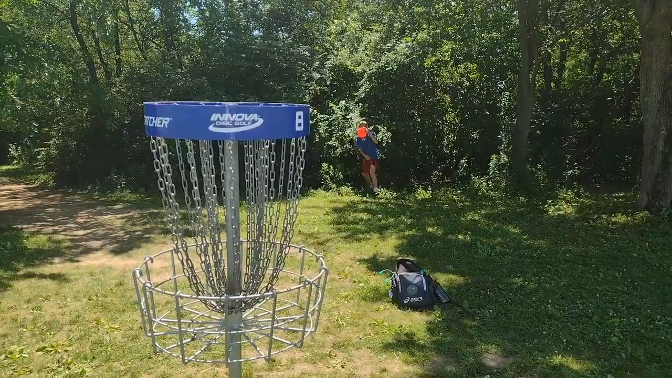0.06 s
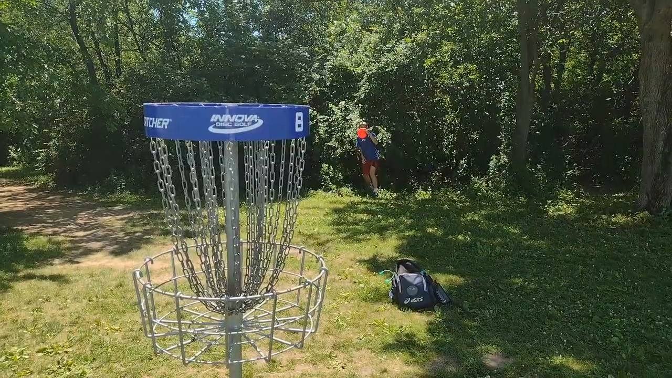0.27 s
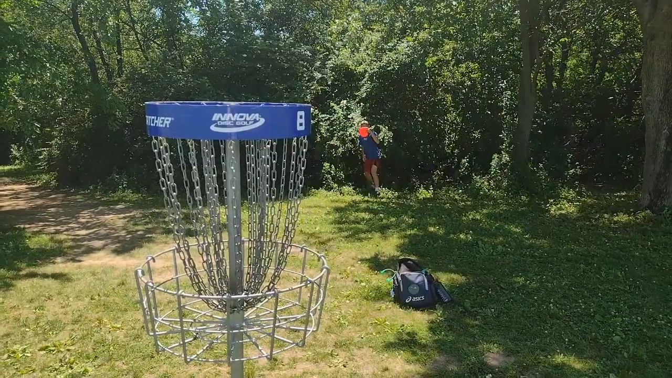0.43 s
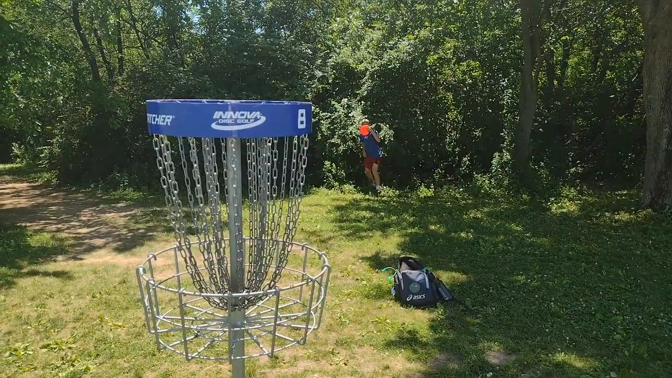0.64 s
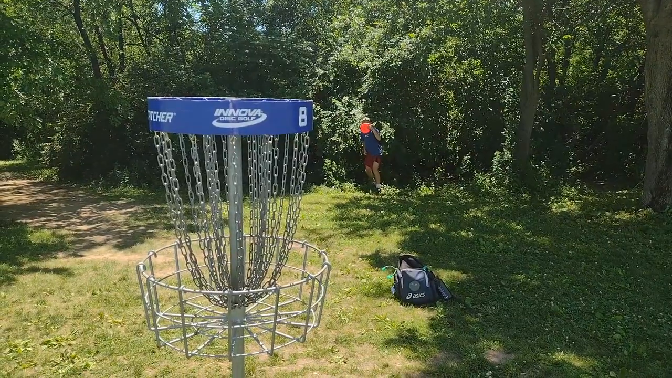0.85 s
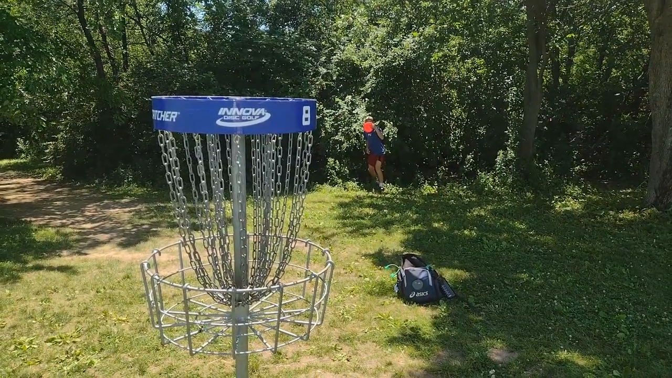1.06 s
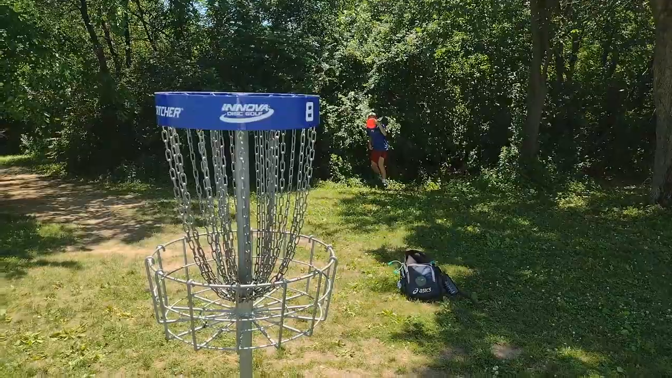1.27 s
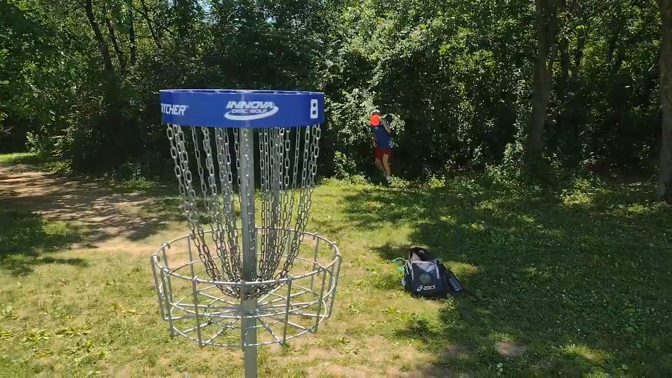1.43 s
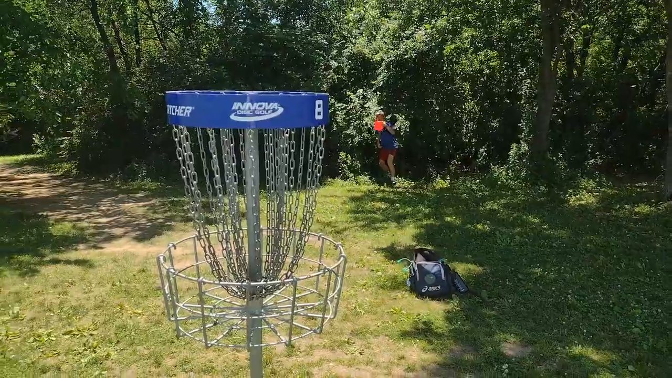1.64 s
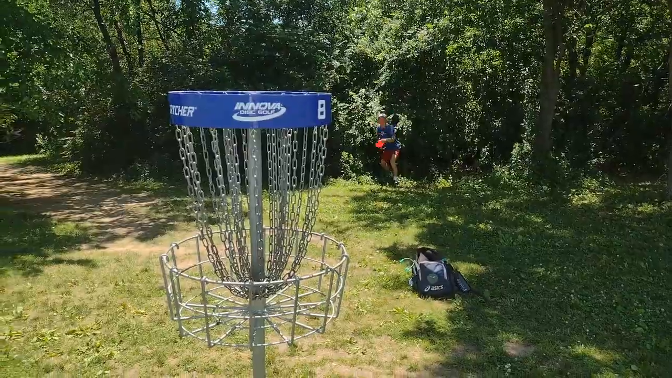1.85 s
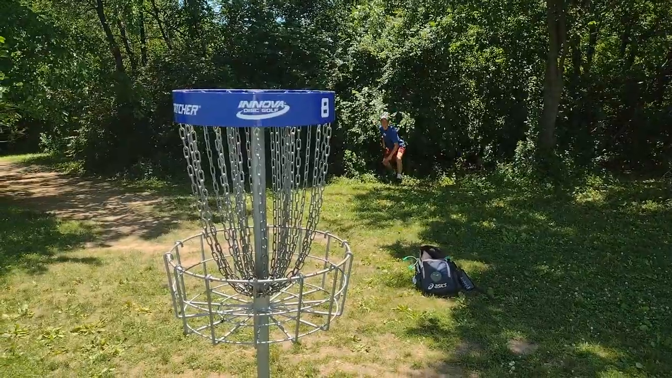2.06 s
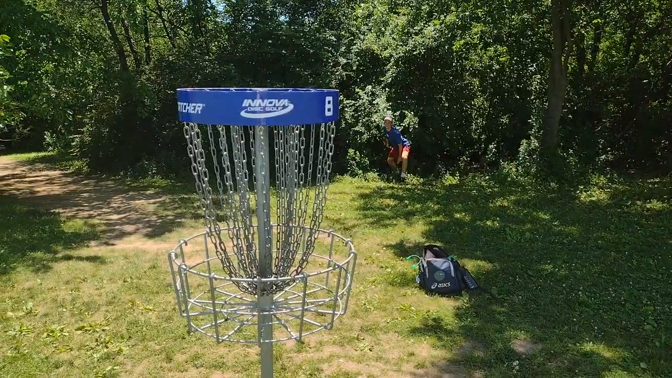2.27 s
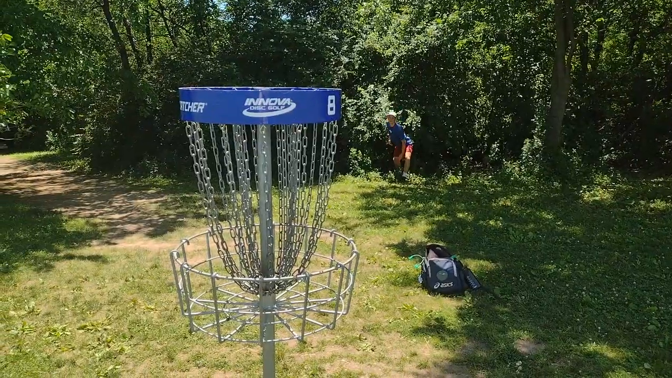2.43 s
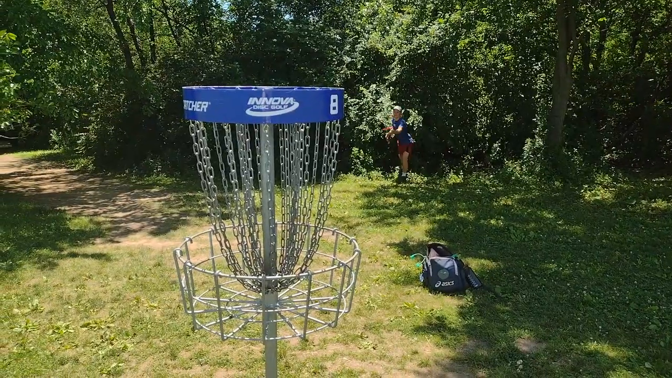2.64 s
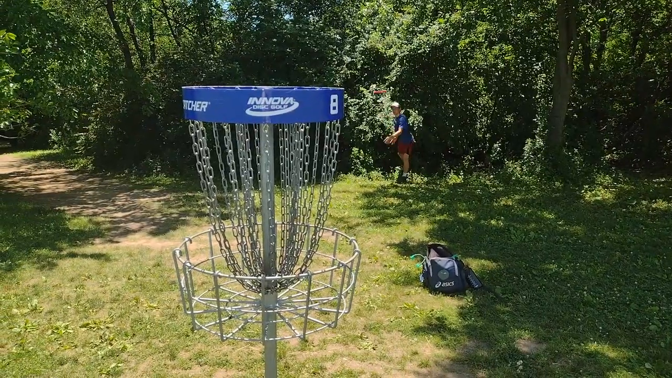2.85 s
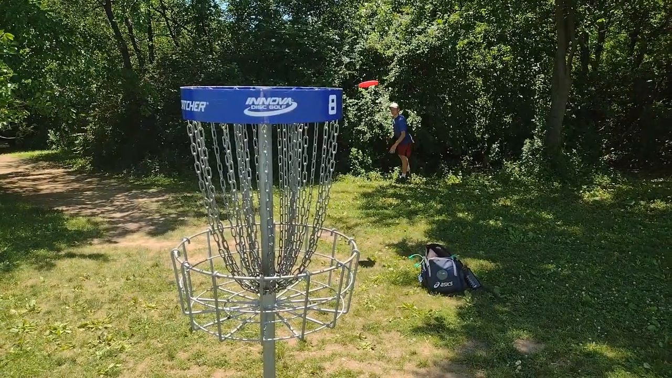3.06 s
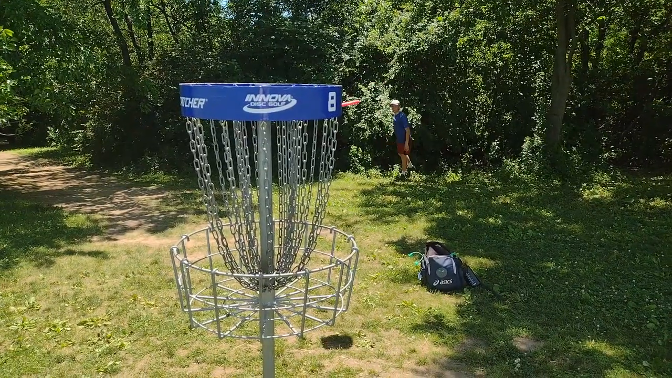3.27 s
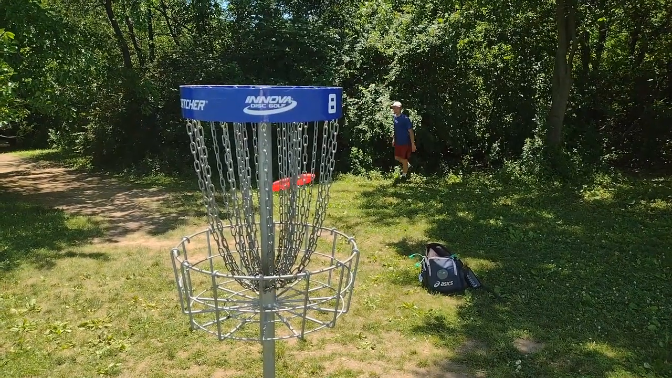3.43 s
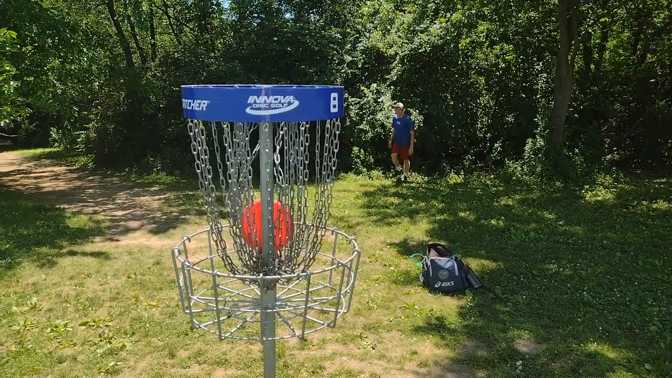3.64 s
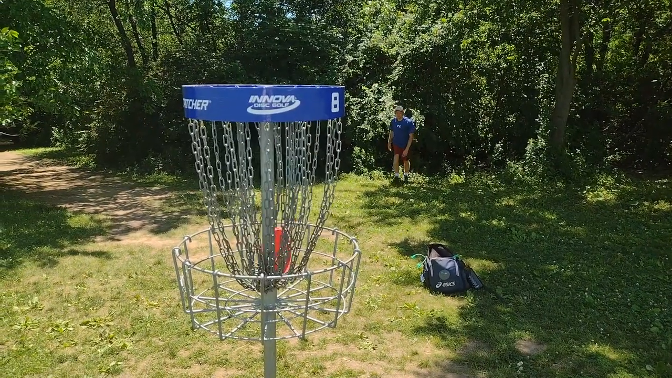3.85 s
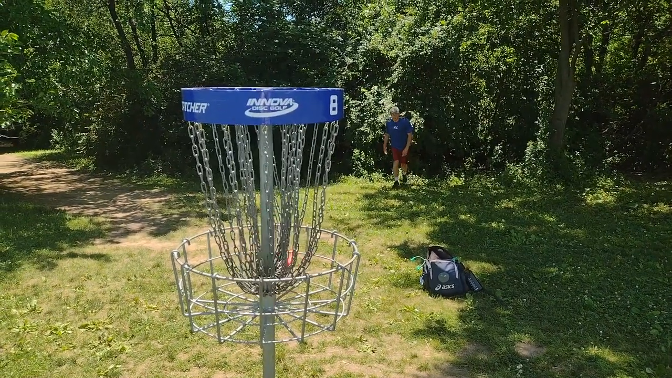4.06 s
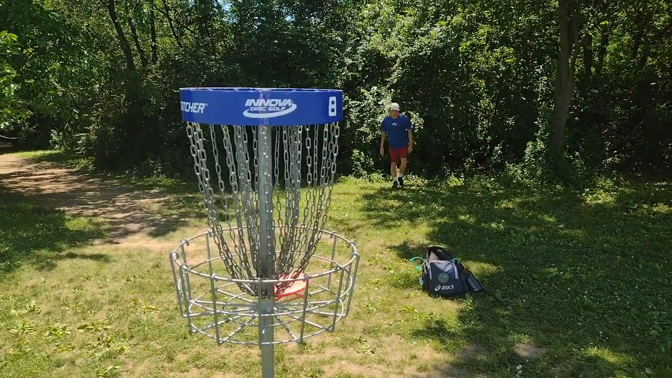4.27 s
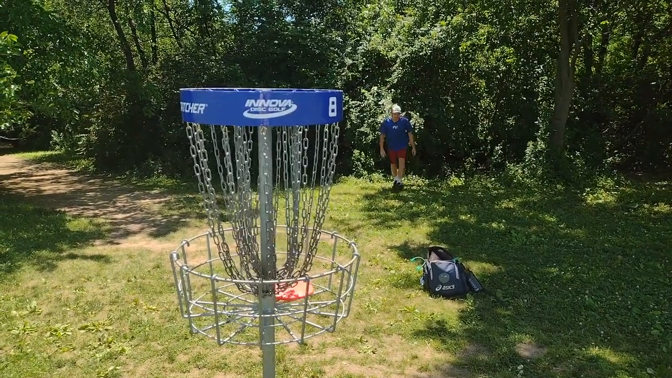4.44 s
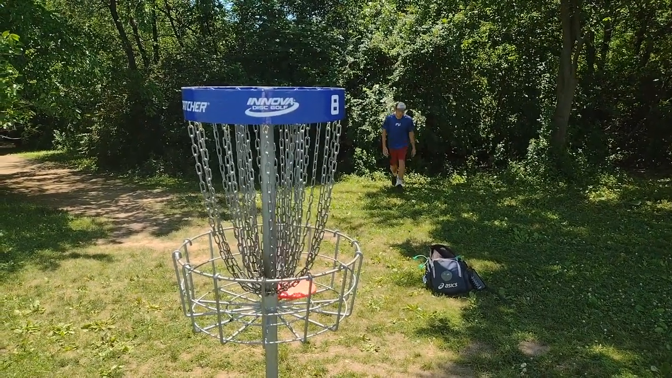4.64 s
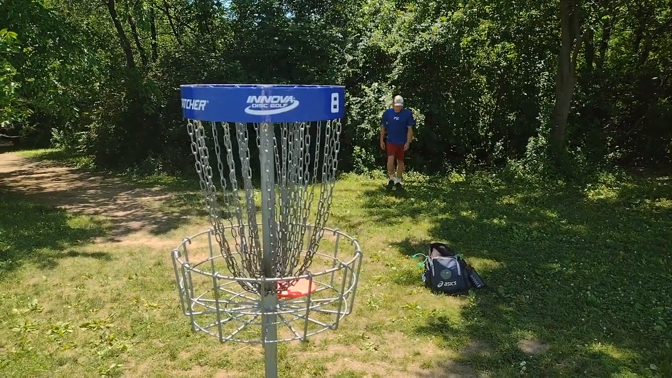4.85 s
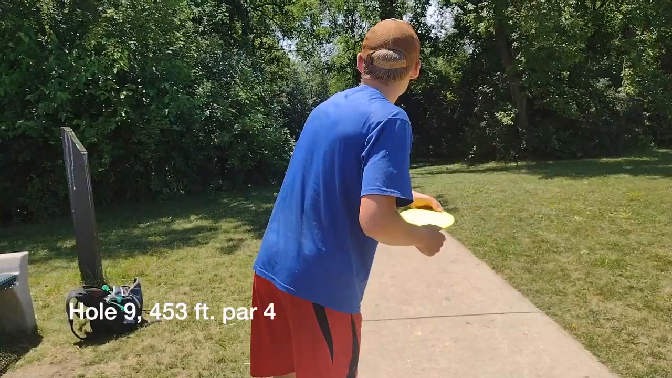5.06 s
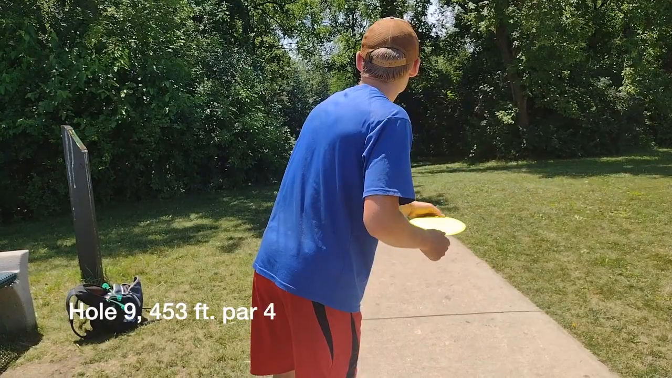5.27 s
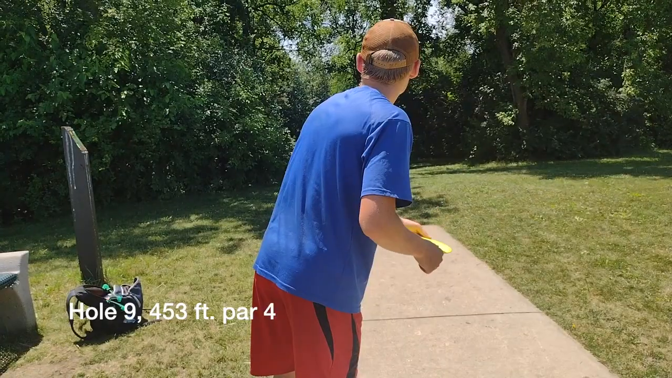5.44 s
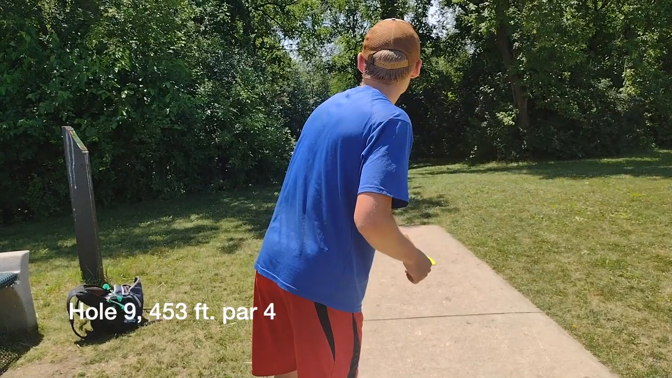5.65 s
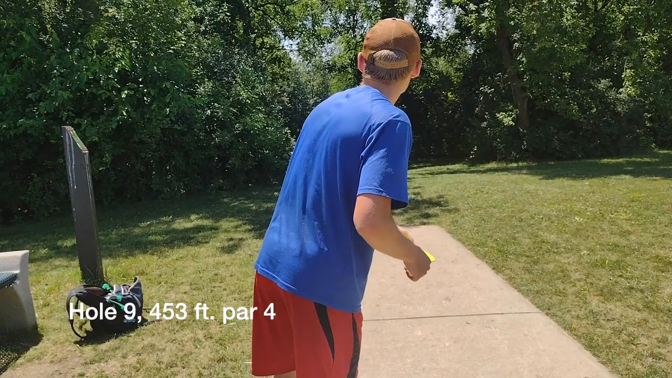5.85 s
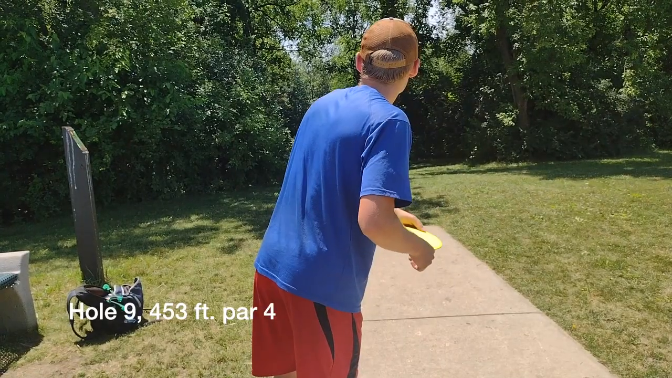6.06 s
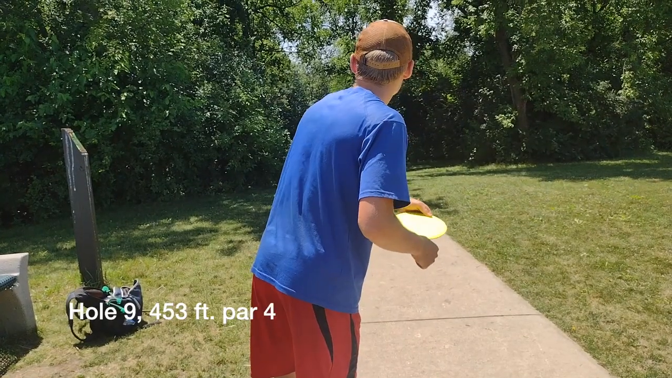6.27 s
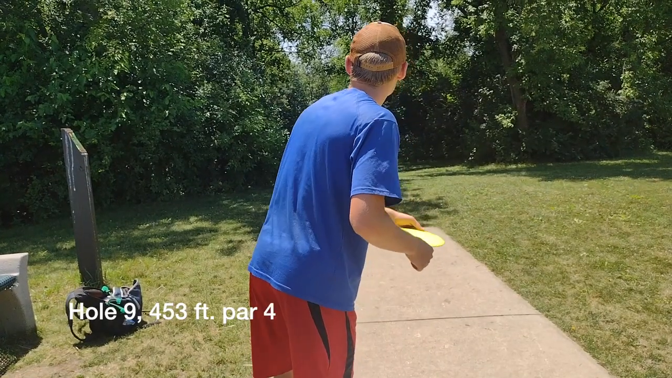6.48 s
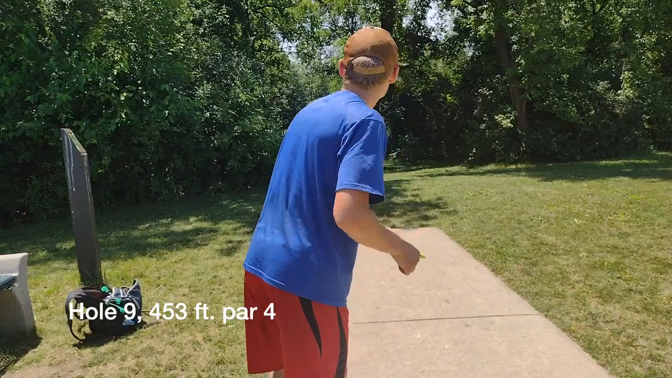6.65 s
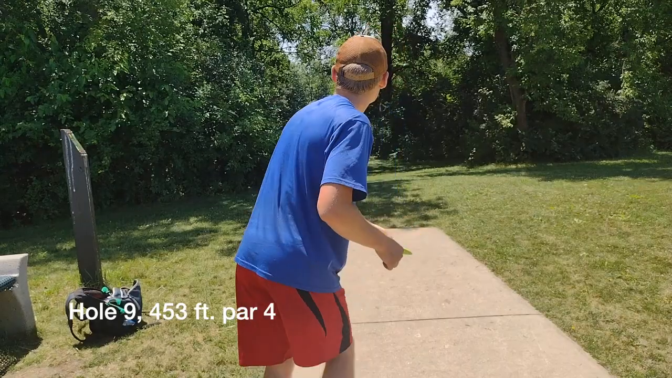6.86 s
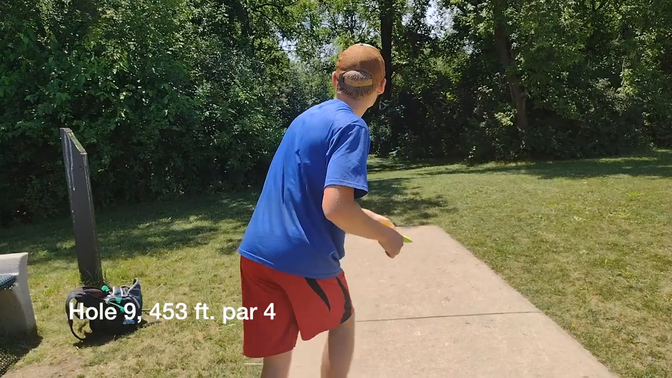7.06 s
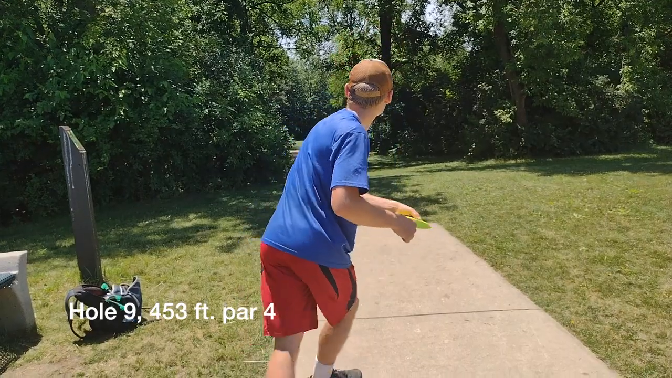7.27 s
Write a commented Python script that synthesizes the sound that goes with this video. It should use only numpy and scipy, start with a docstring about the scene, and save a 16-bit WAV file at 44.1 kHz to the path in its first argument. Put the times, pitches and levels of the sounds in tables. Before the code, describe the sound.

A sudden, bright jangle of steel chains breaks the outdoor quiet as a plastic disc strikes a metal basket nearby, slightly to the right. Hollow knocks and clanks follow as the disc drops into the wire tray, then a fading metallic hum and a couple of small taps. Before and after the hit there is only a very faint rumble of far traffic and some distant bird whistles among the trees.

```python
"""Birds call over distant traffic in a wooded park. At 3.5 s a plastic disc flies into the hanging chains
of a steel basket close by: the links clash and ring, and the pole clangs. The disc knocks its way down
and at 4.2 s lands in the wire tray, which hums on as the chains slip. Just after 5 s the scene changes
abruptly to another quiet spot by the trees, with more bird calls."""
import sys
import numpy as np
from scipy import signal
from scipy.fft import rfft, irfft
from scipy.io import wavfile

SR = 44100
rng = np.random.default_rng(int(sys.argv[2]) if len(sys.argv) > 2 else 0)


def master(y):
    """Save y as 16-bit WAV."""
    cut = np.clip(np.atleast_2d(y).T, -1, 1)
    pcm = np.round(cut * 32767)  # scale
    wavfile.write(sys.argv[1], SR, pcm.astype(np.int16))


N = 322371
TIME = np.arange(N) / SR
HIT_S, LANDING_S, CHANGE_S = 3.504, 4.2, 5.06

# The disc knocks on chains, pole and tray; the last two faint knocks are chains slipping.
# Each row: start in seconds, slap level in dB, low note's level in dB relative to the slap level.
BASKET_KNOCKS = [(3.507, -22, -13), (3.526, -14, -18), (3.544, -13, -23), (3.553, -10, -19),
                 (3.566, -9, -25), (3.583, -14.5, -24), (3.616, -20, -17), (3.650, -16, -17),
                 (3.659, -18, -10), (3.682, -31, -9), (3.695, -14, -17.5), (3.707, -18, -30),
                 (3.771, -20.5, -16), (3.812, -19, -13.5), (3.838, -15, -37), (3.861, -18, -9),
                 (3.896, -14, -16.5), (3.944, -14.5, -4.5), (3.951, -36, 4), (4.016, -20, -3),
                 (4.148, -27, -4.5), (4.218, -27, -7), (4.257, -20, -4.5), (4.2823, -22, -5.5),
                 (4.3237, -22, -10.5), (4.414, -20.5, -23), (4.434, -21, -9), (4.459, -36, -1),
                 (4.487, -28, -11), (4.687, -33, -15), (4.960, -42.5, -20)]
# The chains surge as the disc drives in, drops through and the strands swing back.
# Each row: start in seconds, length in seconds, ring level in dB, hard contact level in dB.
CHAIN_SURGES = [(3.501, .02, -35, -32), (3.559, .028, -16.5, -27), (3.636, .29, -26.5, -38),
                (3.948, .045, -27, -34.5), (4.03, .06, -28, -42), (4.147, .11, -37, -52),
                (4.313, .15, -40.5, -58), (4.52, .5, -58, -71), (4.655, .04, -47.5, -62),
                (4.914, .07, -59.5, -70)]
# The tone colour of link striking link. Each row: frequency in Hz, level in dB.
CONTACT_COLOUR = [(100, -44.5), (400, -10), (800, 3), (1500, -3.5), (2500, 2.5), (3400, -3.5), (4800, 2),
                  (6000, -2.5), (7500, -2), (10000, 2.5), (13000, -0.5), (15500, -10)]


def undb(db):
    """Turn decibels into a factor to multiply by."""
    return 10 ** (np.asarray(db) / 20)


def level(x, db):
    """Scale a sound to an average (rms) level in dB."""
    return x * undb(db) / np.sqrt(np.mean(x ** 2))


def fade(t, t60):
    """A smooth decay that is 60 dB down after the fade time, t60 seconds."""
    return np.exp(-np.log(1000) * t / t60)


def add(track, start_s, sound):
    """Mix a sound into the track at a given time."""
    i = int(start_s * SR)
    track[:, i:i + sound.shape[-1]] += sound[..., :N - i]


def colour(x, points, size=4096):
    """Shape the tone along a curve of (Hz, dB) points; white noise keeps its power."""
    hz, db = np.transpose(points)
    gain = undb(np.interp(np.log(np.fft.rfftfreq(size, 1 / SR) + 1), np.log(hz), db))
    # build the filter so that it never sounds ahead of its input
    cepstrum = irfft(np.log(gain))
    cepstrum[1:size // 2] *= 2
    cepstrum[size // 2 + 1:] = 0
    response = irfft(np.exp(rfft(cepstrum)))
    return signal.fftconvolve(x, response[None] / np.linalg.norm(response), axes=-1)[:, :x.shape[-1]]


def stereo(pair, split_hz):
    """Two unrelated signals become left and right: alike in the bass, unrelated in the treble."""
    side = signal.sosfilt(signal.butter(2, split_hz, "high", fs=SR, output="sos"), pair[1])
    return np.array([pair[0] + side, pair[0] - side]) / np.sqrt(2)


def tone(t, hz, t60, lead):
    """One fading tone of a struck object; the left channel is ahead by `lead` radians."""
    return np.sin(2 * np.pi * hz * t + np.array([[lead], [0]])) * fade(t, t60)


def from_right(x, shadow_hz=1500, left_db=-3.5, right_db=2.5):
    """The microphone's body shades the treble on the left and lifts it on the right."""
    low = signal.lfilter(*signal.butter(1, shadow_hz, fs=SR), x)
    return low + (x - low) * undb([[left_db], [right_db]])


def traffic_and_leaves(points, db, split_hz, width, sway_db):
    """Distant traffic and leaves: a gently swaying rumble under a thin, steady hiss."""
    air = stereo(rng.standard_normal((2, N)), split_hz) + width * rng.standard_normal((2, N))
    air = level(colour(air, points), db)
    rumble = signal.lfilter(*signal.butter(1, 300, fs=SR), air)
    sway = np.interp(TIME, np.linspace(0, TIME[-1], 60), rng.standard_normal(60))
    return air + rumble * (undb(sway_db * sway) - 1)


def engine(hz, width_hz, db):
    """A far engine drones on a wavering note, made of a narrow band of noise."""
    band = signal.butter(2, [hz - width_hz / 2, hz + width_hz / 2], "band", fs=SR, output="sos")
    return level(signal.sosfilt(band, rng.standard_normal(N)), db)


def woods():
    """The background at the basket: the traffic lies to the right, so it reaches the left side late."""
    # The tone colour of the woods. Each row: frequency in Hz, level in dB.
    woods_colour = [(15, -50), (25, -15), (48, -4), (112, 0.5), (146, -5), (237, -5.5), (335, -18),
                    (404, -17.5), (558, -21.5), (856, -12), (1030, -16.5), (1280, -27), (1500, -28.5),
                    (5280, -42), (15000, -43.5)]
    air = traffic_and_leaves(woods_colour, db=-62.5, split_hz=1300, width=.11, sway_db=.7)
    left, right = air + engine(hz=410, width_hz=27, db=-80.5)
    return np.array([np.roll(left, 18), right])


def clearing():
    """The background at the second spot: a little quieter, with a deeper engine."""
    # The tone colour of the clearing. Each row: frequency in Hz, level in dB.
    clearing_colour = [(15, -45), (25, -29), (43, -12), (135, -4.5), (231, -14.5), (344, -21), (383, -23.5),
                       (415, -28.5), (749, -20), (1090, -26.5), (1350, -26), (1630, -33.5), (1860, -34.5),
                       (2930, -40.5), (15000, -48)]
    air = traffic_and_leaves(clearing_colour, db=-65, split_hz=1000, width=.14, sway_db=.8)
    return air + engine(hz=137.2, width_hz=9.8, db=-72.5)


def birds(waver=0.017, scatter_db=2, echo_db=-3, echo_t60=0.46):
    """Far birds whistle gliding notes, no two alike, smeared by echoes from the trees."""
    # Single notes. Each row: start and length in seconds, first and last pitch in Hz, level in dB.
    notes = [(0.23, 0.1, 1800, 1730, -79.5), (0.488, 0.14, 1830, 1700, -79.5),
             (0.879, 0.047, 1510, 1540, -77), (1.05, 0.065, 1540, 1480, -80),
             (3.187, 0.11, 1485, 1440, -79), (5.035, 0.062, 1442, 1321, -66),
             (5.639, 0.0707, 1408, 1330, -67), (6.513, 0.058, 1387, 1364, -67),
             (7.246, 0.072, 1375, 1360, -70)]
    # Repeated notes. Each row: start, stop, spacing and note length in seconds,
    # first and last pitch in Hz, level in dB.
    songs = [(.88, 3.5, .321, .055, 1920, 2200, -80), (.95, 3.3, .321, .042, 3700, 2650, -81.5),
             (6.77, 7.3, .093, .03, 4650, 3600, -82)]
    out = np.zeros((2, N))
    repeats = [(s, *note) for start, stop, step, *note in songs for s in np.arange(start, stop, step)]
    for s, length, start_hz, end_hz, db in notes + repeats:
        progress = np.linspace(0, 1, int(length * SR))
        wobble = np.interp(progress, np.linspace(0, 1, 20), rng.standard_normal(20))
        flutter = np.interp(progress, np.linspace(0, 1, 20), rng.standard_normal(20))
        hz = (start_hz + (end_hz - start_hz) * progress) * (1 + waver * wobble)
        loudness = undb(db + scatter_db * (flutter + rng.standard_normal() / 2))
        add(out, s, loudness * np.sin(np.pi * progress) * np.sin(2 * np.pi * np.cumsum(hz) / SR))
    trees = rng.standard_normal((2, SR // 2)) * fade(TIME[:SR // 2], echo_t60)
    echo = signal.fftconvolve(out, trees / np.linalg.norm(trees[0]), axes=-1)[:, :N]
    return out + undb(echo_db) * echo


def tray(jangle, hanging_db=-47.5, landed_db=-19, tug_db=-4, wash_db=-5, wash_t60=1.0, beat_hz=8):
    """The wire tray stores energy from knocks and tugging chains and gives it off as a pulsing hum."""
    # The tray's main tones. Each row: pitch in Hz, level in dB, fade time in seconds.
    tray_tones = [(236, -3.5, .6), (404, -0.5, .6), (435, 0, .6), (509, -5, 0.59), (1028, -8.5, 0.83),
                  (1179, 3.5, 0.7), (1300, -3, 0.54), (1346, -2, 0.96), (1439, -4.5, 1.1),
                  (1500, -7.5, 1.2), (1750, -13.5, 2.8), (1880, -4.5, 1.1), (2093, -5.5, .9),
                  (2266, -7.5, 1.3), (2246, -4.5, 0.96), (2377, -0.5, 1.2), (2420, -10, .85),
                  (2815, -7, 1.2), (2885, -4, .7), (2980, -12.5, 1.4), (3260, -6, 0.62), (3620, -18, 0.77),
                  (4670, -16.5, 1)]
    # Its many weaker tones blur into a wash of noise. Each row: frequency in Hz, level in dB.
    wash_colour = [(30, -25.5), (70, 5), (200, 1), (400, 3.5), (520, 1), (700, -4.5), (900, 3.5),
                   (1350, 3.5), (2200, 2), (3000, -6.5), (3700, -12), (4600, -18.5), (6000, -27),
                   (12000, -42.5)]
    start, t = int(HIT_S * SR), TIME[:2 * SR]
    energy_in = (undb(tug_db) * jangle[0, start:start + len(t)]) ** 2 / SR
    for s, db, _ in BASKET_KNOCKS:
        shake_db = hanging_db if s < LANDING_S else landed_db  # weak while the disc is in the chains
        energy_in[max(int(s * SR) - start, 0)] += undb(db + shake_db) ** 2

    def swing(t60):
        """How strongly a tone swings as its stored energy drains away."""
        return np.sqrt(signal.lfilter([1], [1, -fade(2 / SR, t60)], energy_in))

    wash = colour(stereo(rng.standard_normal((2, len(t))), 2000), wash_colour)
    ring = level(wash, wash_db) * swing(wash_t60)
    total = np.linalg.norm([undb(db) for _, db, _ in tray_tones])
    for hz, db, t60 in tray_tones:
        detune, lead, offset = rng.standard_normal(3)
        phase = 2 * np.pi * hz * t + np.array([[lead * hz / 2500], [0]])
        # a slightly mistuned twin makes each tone pulse
        twin = 0.39 * np.sin(phase + 2 * np.pi * (beat_hz * detune * t + offset))
        ring += undb(db) / total * swing(t60) * (np.sin(phase) + twin)
    out = np.zeros((2, N))
    add(out, HIT_S, ring)
    return out


def pole(jangle, chatter=.9, chatter_t60=0.037, rattle_db=-49, rattle_t60=.2):
    """Chains hit the steel pole and chatter along it; it answers with two tones."""
    # Chains whip the pole. Each row: start in seconds, low tone's level in dB, high tone's level in dB.
    clangs = [(3.504, -25, -21), (3.525, -23.5, -30), (3.552, -19.5, -56), (3.567, -27.5, -11.5),
              (3.589, -41, -10), (3.61, -14.5, -22.5), (3.661, -26.5, -25), (3.688, -45, -23.5),
              (3.779, -44, -18), (3.842, -31, -18), (3.851, -32.5, -20), (3.93, -31.5, -18),
              (3.951, -30, -26), (4.012, -37, -21), (4.059, -29.5, -23.5), (4.096, -51, -26.5),
              (4.181, -43, -40), (4.49, -59, -43)]
    # The pole's tones. Each row: pitch in Hz, fade time in seconds, left channel's lead in radians.
    pole_tones = [(1733, .065, .2), (4377, .095, 2.95)]
    out, t = np.zeros((2, N)), TIME[:SR // 4]
    for s, *levels_db in clangs:
        for db, (hz, t60, lead) in zip(levels_db, pole_tones):
            touches = rng.standard_normal(len(t)) * (rng.random(len(t)) < .02) * fade(t, chatter_t60)
            push = chatter * touches / np.linalg.norm(touches)
            push[0] += .7  # the first blow
            pitch = hz * (1 + 0.0042 * rng.standard_normal())
            ring = signal.fftconvolve(push[None], tone(t, pitch, t60, lead), axes=-1)[:, :len(t)]
            add(out, s, undb(db) * ring / np.abs(ring).max())
    # the rattling chains keep the high tone shimmering
    hz, _, lead = pole_tones[-1]
    rattle = np.abs(jangle[1]) * rng.standard_normal(N)
    shimmer = signal.fftconvolve(rattle[None], tone(t, hz, rattle_t60, lead), axes=-1)[:, :N]
    return out + level(shimmer, rattle_db)


def rim_clacks(clack_db=4, t60=0.025):
    """The landed disc's rim strikes bare wire with a hard clack; the two chain slips clack faintly too."""
    # The tone colour of the rim on wire. Each row: frequency in Hz, level in dB.
    clack_colour = [(100, -33), (480, 31), (1300, -11), (2200, 17), (3500, -14.5), (9000, -36)]
    out, t = np.zeros((2, N)), TIME[:SR // 20]
    for s, db, _ in BASKET_KNOCKS:
        if s > LANDING_S:
            burst = rng.standard_normal((2, len(t))) * fade(t, t60)
            add(out, s, undb(db + clack_db) * burst / np.linalg.norm(burst[0]))
    return colour(stereo(out, 2000), clack_colour)


def disc(slap_db=5.5, flex_db=2, rebound_s=0.0037, scrape=0.17, scrape_t60=0.015):
    """Each knock is a sharp slap, a rebound and a short scrape; the plastic flexes with a hollow note."""
    # The flexing disc's tones. Each row: pitch in Hz, level in dB, fade time in seconds.
    disc_tones = [(268, -7.5, 0.022), (342, 1, 0.042), (726, -11, 0.065)]
    # The tone colour of plastic on steel. Each row: frequency in Hz, level in dB.
    slap_colour = [(30, -59), (70, -25.5), (160, -26), (300, -1), (500, -10.5), (750, 5), (1100, 0.5),
                   (1600, 1), (2400, -6.5), (4000, -32), (9000, -41.5)]
    slaps, flexing = np.zeros((2, 2, N))
    t = TIME[:SR // 8]
    bend = 1 - np.exp(-t / 0.0024)  # the disc takes a moment to give way
    for s, db, low_db in BASKET_KNOCKS:  # the two chain slips use the same sound, faintly
        push = scrape * rng.standard_normal((2, len(t))) * fade(t, scrape_t60)
        rebound_at = int(rebound_s * SR * (.5 + rng.random()))
        push[0, [0, rebound_at]] += 2  # the slap and an equally hard rebound
        add(slaps, s, undb(db + slap_db) * push)
        for hz, tone_db, t60 in disc_tones:
            pitch = hz * (1 + .045 * rng.standard_normal())  # depends on where the chains hold the disc
            add(flexing, s, undb(db + low_db + flex_db + tone_db) * bend * tone(t, pitch, t60, 0))
    # so small a disc gives off little bass
    flexing = signal.sosfilt(signal.butter(3, 190, "high", fs=SR, output="sos"), flexing)
    return colour(stereo(slaps, 1700), slap_colour) + flexing


def crunch(t60=0.075, grit=.6):
    """Links squeezed under the disc cannot ring; they grind in a short, gritty burst."""
    # The disc crushes strands together. Each row: start in seconds, level in dB.
    crunches = [(3.505, -22.5), (3.525, -25), (3.567, -17.5), (3.577, -21), (3.613, -30), (3.634, -27),
                (3.652, -27.5), (3.944, -29.5), (4.059, -52)]
    # The tone colour of squeezed links. Each row: frequency in Hz, level in dB.
    crunch_colour = [(500, -19), (1500, -7), (2600, -1), (3300, 1), (4100, 1.5), (5200, -6.5), (6400, -5),
                     (8000, -23.5), (15000, -19)]
    out, t = np.zeros((2, N)), TIME[:SR // 8]
    for s, db in crunches:
        grains = rng.standard_normal((2, len(t))) * np.exp(grit * rng.standard_normal(len(t)))
        add(out, s, level(grains, db) * fade(t, t60))
    return colour(stereo(out, 2000), crunch_colour)


def link(t, uneven_db=4):
    """One steel link rings, tuned a little differently from all the others."""
    # A link's tones. Each row: pitch in Hz, spread between links as a share of the pitch,
    # level in dB, fade time in seconds, left channel's lead in radians.
    link_tones = [(1768, .055, -24.5, .085, .2), (4424, .02, -14, .07, 3.3), (9120, .016, -8.5, .08, 3.4),
                  (11700, .0033, 1, .16, 5.9), (11560, .016, -3, .09, 3.6), (12070, .03, -5.5, .07, 5.8),
                  (12750, .007, -1.5, .12, 7.0), (14000, .012, -12, .08, 7.6)]
    ring = 0
    for hz, spread, db, t60, lead in link_tones:
        detune, strength, place = rng.standard_normal(3)
        pitch = hz * (1 + spread * detune)
        ring += undb(db + uneven_db * strength) * tone(t, pitch, t60, lead + place * hz / 10000)
    return ring / np.linalg.norm(ring[1])


def clink(t, count=10, t60=0.0881):
    """A link leaning on its neighbours has a few more pitches of its own, from low to very high."""
    pitches = 700 + 14800 * ((np.arange(count) + rng.random(count)) / count) ** 1.3
    ring = 0
    for hz in pitches:
        strength = hz ** .1 * (0.53 + rng.random())
        ring += strength * tone(t, hz, t60 * (.5 + rng.random()), rng.standard_normal() * hz / 2500)
    return ring / np.linalg.norm(ring[1])


def strand_snaps(t60=0.071, clink_share=.6, tick_share=.5, tick_t60=0.00406):
    """A whole strand snaps tight with a tick: several links ring at once and damp each other."""
    # The hardest single clashes. Each row: start in seconds, peak level in dB.
    snaps = [(3.541, -11.5), (3.579, -11), (3.608, -10.5), (3.660, -23.5), (3.680, -15.5), (3.713, -20),
             (3.807, -16.5), (3.957, -15.5), (4.157, -16.5), (4.223, -32), (4.261, -24), (4.352, -32.5),
             (4.400, -32), (4.589, -41), (4.636, -42.5), (4.680, -35), (4.925, -46)]
    out, t = np.zeros((2, N)), TIME[:SR // 12]
    for s, db in snaps:
        tick = colour(rng.standard_normal((2, len(t))) * fade(t, tick_t60), CONTACT_COLOUR)
        ring = (sum(link(t) for _ in range(3)) + clink_share * clink(t)) * fade(t, t60)
        snap = ring + tick_share * tick / np.linalg.norm(tick)
        add(out, s, snap * undb(db) / np.abs(snap).max())
    return out


def surge_level(levels_db, rise_s, sag_db_per_s, release_t60):
    """The chains' level over time in dB: each surge rises, sags and dies away, and their powers add."""
    power, age = np.full((1, N), 1e-12), TIME[:SR]
    for (s, length, *_), db in zip(CHAIN_SURGES, levels_db):
        rise = np.minimum(age / rise_s, 1)
        release = fade(np.maximum(age - length, 0), release_t60)
        add(power, s, (rise * undb(db - sag_db_per_s * age) * release) ** 2)
    return 10 * np.log10(power[0])


def chains(count=1100, scatter_db=5.0, ring_db=1.5, contact_db=4.0, tick_t60=0.0095):
    """Links clash at random, more often and harder in each surge; each clash ticks, clinks and rings."""
    _, _, ring_surges_db, contact_surges_db = np.transpose(CHAIN_SURGES)
    ring_level = surge_level(ring_surges_db, rise_s=.012, sag_db_per_s=17, release_t60=.18)
    contact_level = surge_level(contact_surges_db, rise_s=.006, sag_db_per_s=14, release_t60=.38)
    t = TIME[:SR // 9]
    links = [(link(t), clink(t)) for _ in range(72)]
    rate = undb(.35 * contact_level) * (TIME > HIT_S) * (TIME < CHANGE_S)
    rate *= count / rate.sum()  # clashes per sample
    times = np.interp(np.arange(count) + rng.random(count), np.cumsum(rate), TIME)
    sizes = level(undb(scatter_db * np.clip(rng.standard_normal(count), -2, 2)), 0)
    rings, contacts = np.zeros((2, 2, N))
    tick_fade = fade(t, tick_t60)
    for s, size in zip(times, sizes):
        now = int(s * SR)
        # a clash carries the energy of the average gap between clashes at that moment
        strength = rng.choice([-1, 1]) * size / np.sqrt(max(rate[now], 1 / SR))
        ring, clinking = links[rng.integers(len(links))]
        tick = rng.standard_normal(len(t)) * tick_fade / np.linalg.norm(tick_fade)
        contact = .93 * clinking + .36 * np.array([tick, np.roll(tick, rng.integers(6))])
        add(rings, s, ring * strength * undb(ring_db + ring_level[now]))
        add(contacts, s, contact * strength * undb(contact_db + contact_level[now]))
    return rings + colour(contacts, CONTACT_COLOUR)


def scene():
    """The disc hits the basket in the woods, then the clearing takes over; birds call in both."""
    jangle = chains() + strand_snaps()
    basket = from_right(jangle + crunch() + pole(jangle) + disc() + rim_clacks() + tray(jangle))
    return np.where(TIME < CHANGE_S, basket + woods(), clearing()) + birds()


def record(dry, bass_hz=45, top_hz=15550):
    """The recorder thins the deepest bass, rounds the highest peaks and cuts the top treble."""
    thin = signal.sosfilt(signal.butter(3, bass_hz, "high", fs=SR, output="sos"), dry)
    return signal.sosfilt(signal.ellip(8, .2, 70, top_hz, fs=SR, output="sos"), np.tanh(thin))


dry = scene()
out = record(dry)
master(out)
```